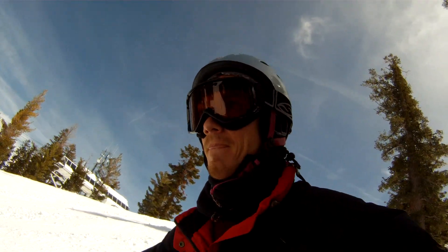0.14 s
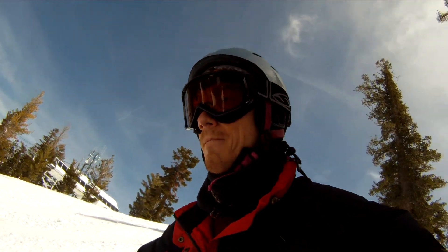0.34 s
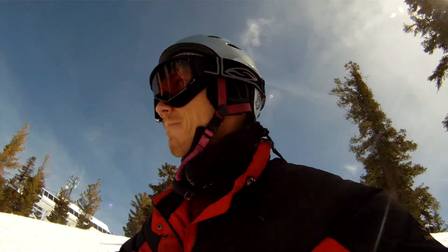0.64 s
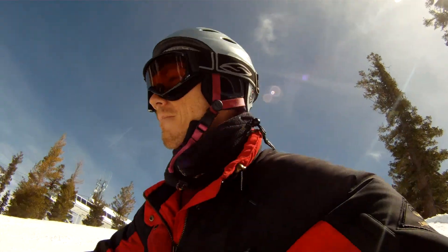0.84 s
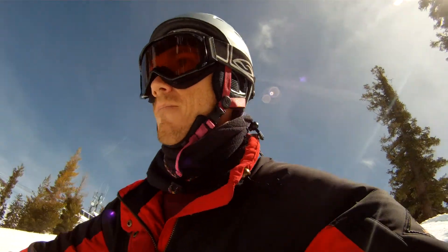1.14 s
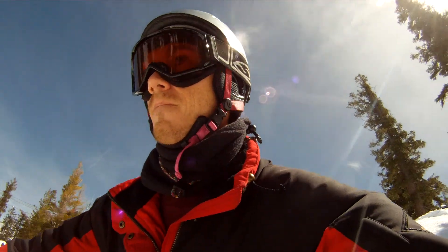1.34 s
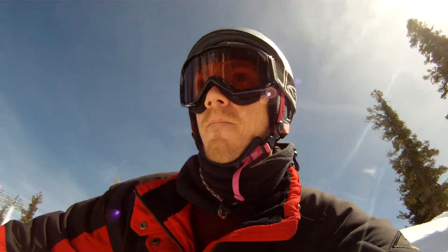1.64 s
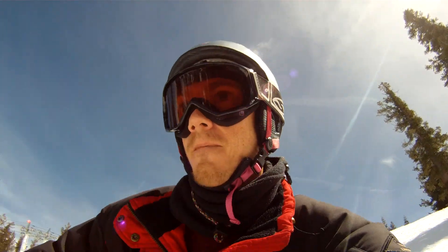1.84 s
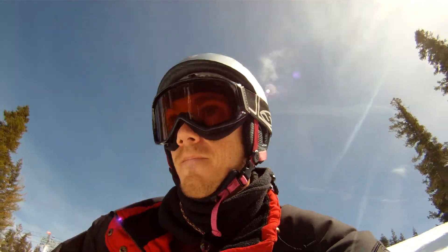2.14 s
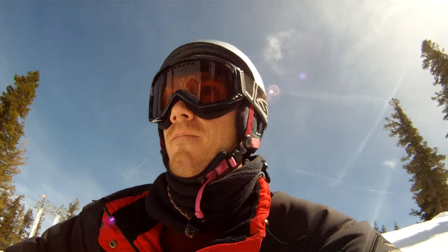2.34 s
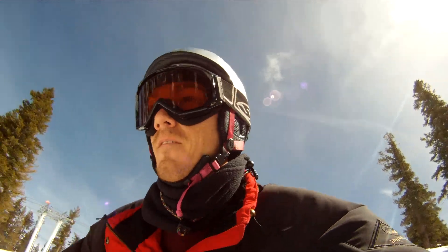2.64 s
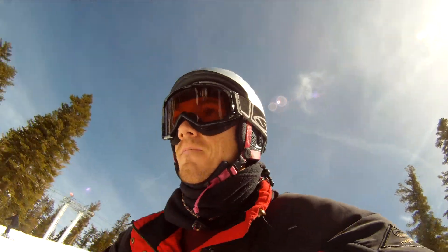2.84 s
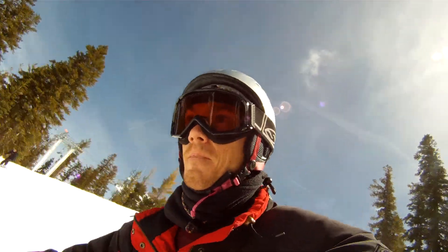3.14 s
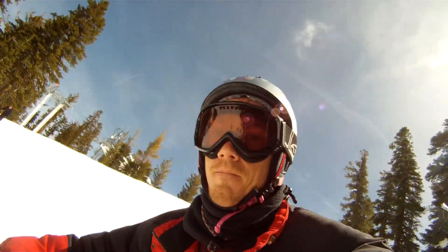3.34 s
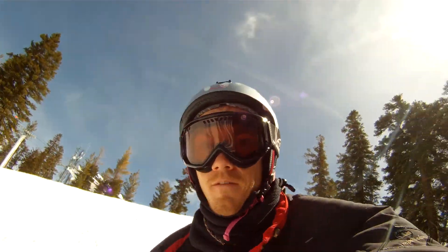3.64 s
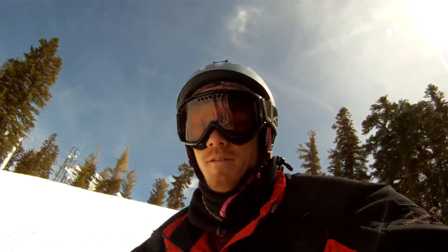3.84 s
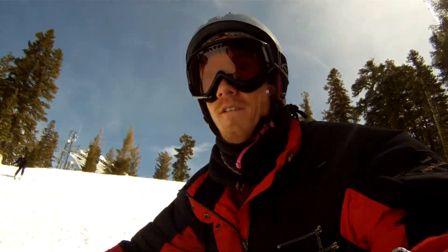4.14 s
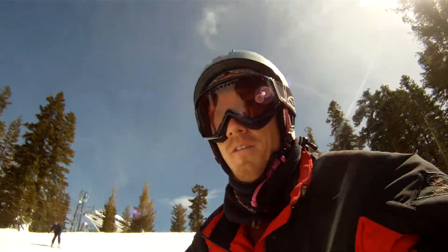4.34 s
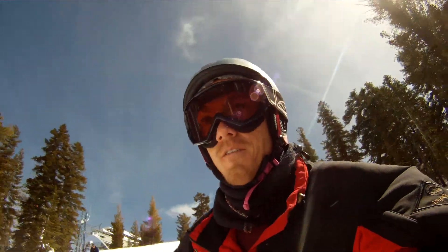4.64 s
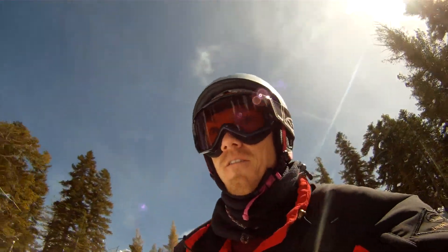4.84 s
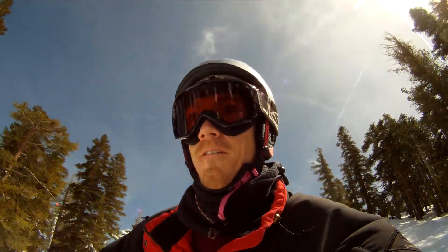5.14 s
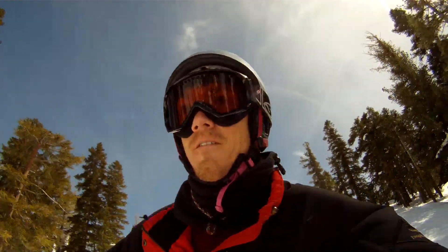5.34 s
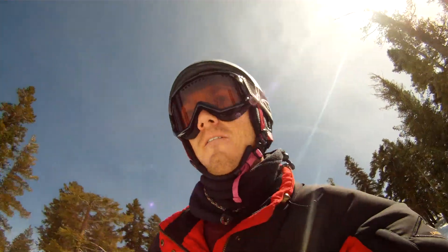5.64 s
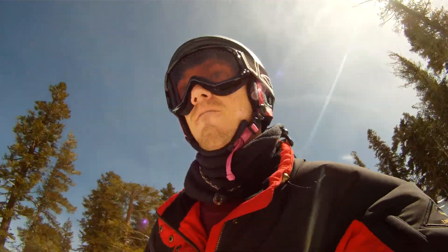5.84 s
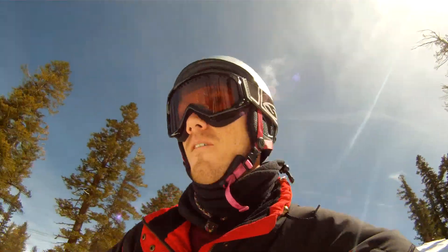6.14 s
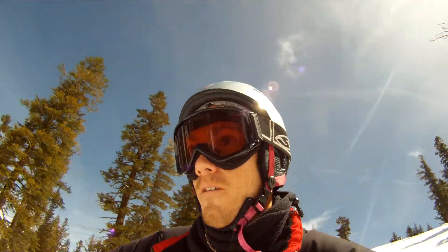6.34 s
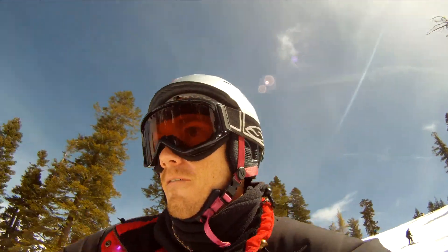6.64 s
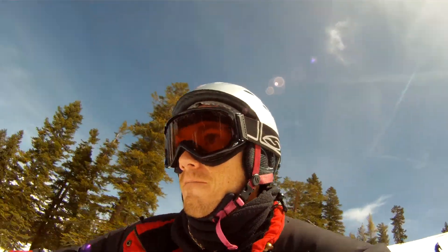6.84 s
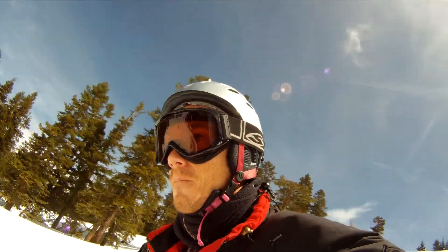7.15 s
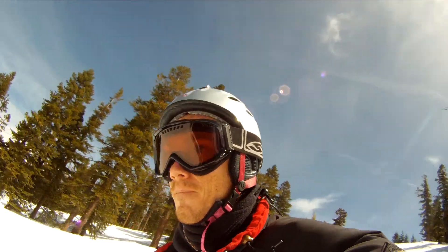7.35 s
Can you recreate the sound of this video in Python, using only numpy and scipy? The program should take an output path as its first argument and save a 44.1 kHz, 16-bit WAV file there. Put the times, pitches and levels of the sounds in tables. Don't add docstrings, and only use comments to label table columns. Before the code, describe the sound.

A skier glides down an open snowy slope, heard from a microphone sealed in a plastic camera housing on a hand-held pole. A grainy, hollow snow hiss runs throughout, with deep lumpy wind buffets and a very faint airy whistle. From 0 to 0.85 s, dry, bright ticks cluster through the pole. The scrape is fuller around 1.4-2 s, then eases toward 3 s with brief edge-bite swells and isolated ticks. From 3.9 s knocks gather; at 4.19 s comes the loudest, a hard plastic clack with a fast chatter, followed by short low hums and smaller knocks until 4.6 s. A second sharp snap lands at 5.14 s. Scattered ticks continue while the hiss builds again, strongest and sprayiest around 6.6-6.9 s, then softens, with a last tick near 7.4 s. The treble is gritty and coarse.

```python
import sys
import numpy as np
from scipy import signal
from scipy.io import wavfile

SR = 44100
rng = np.random.default_rng(int(sys.argv[2]) if len(sys.argv) > 2 else 0)


def volts_from_decibels(level):
    exponent = np.asarray(level, float) / 20
    return 10 ** exponent


def inscribe(sig):
    pcm = np.round(np.clip(np.atleast_2d(sig).T, -1, 1) * 32767)
    wavfile.write(sys.argv[1], SR, pcm.astype(np.int16))


N = 331191

# t/s, level/dB
SEAL_AIR = [(0.0, -61), (1.05, -64.5), (2.01, -60.5), (2.75, -63), (3.09, -73), (3.51, -58.5), (4.14, -67),
            (4.58, -75), (5.46, -71), (6.3, -69), (6.62, -63), (7.01, -59.5), (7.51, -72)]
# t/s, buffeting level/dB, rush level/dB
WIND_LEVELS = [(0.0, -46, -57), (0.2, -48, -70), (0.55, -46, -65), (0.96, -48.5, -59.5),
               (1.84, -44.5, -56.5), (2.6, -47.5, -57.5), (2.9, -51.5, -65), (3.5, -45.5, -57.5),
               (4.0, -45.5, -56.5), (4.28, -42, -47.5), (4.6, -47, -61), (4.81, -45.5, -56),
               (5.5, -46.5, -53.5), (6.0, -42, -52.5), (6.55, -44.5, -52), (7.51, -46, -58)]
# t/s, peak level/dB, length/s
STRONG_GUSTS = [(0.194, -30.5, 0.019), (0.261, -32, 0.025), (0.32, -35, 0.035), (0.372, -38, 0.047),
                (0.624, -36, 0.0173), (1.045, -35.5, 0.027), (1.082, -36, 0.069), (1.946, -37, 0.021),
                (2.185, -33.5, 0.029), (2.771, -34, 0.04), (2.842, -33, 0.031), (2.906, -33.5, 0.04),
                (3.437, -38, 0.022), (3.619, -35, 0.025), (3.986, -32, 0.01), (4.174, -29, 0.0088),
                (4.261, -30.5, 0.012), (4.365, -35.5, 0.015), (4.99, -41, 0.028), (5.387, -30.5, 0.022),
                (5.45, -35.5, 0.025), (5.56, -37, 0.032), (5.92, -41, 0.061), (6.064, -41, 0.023),
                (6.431, -35, 0.016), (6.455, -31, 0.024), (6.556, -35.5, 0.03), (6.665, -32, 0.022),
                (6.917, -31.5, 0.037), (7.33, -39, 0.02)]
# t/s, peak level/dB, length/s
OUTWARD_JOLT = (5.1405, -27, 0.012)
# t/s, peak level/dB, f/Hz
JOINT_HUMS = [(4.083, -45, 750), (4.125, -44, 745), (4.224, -40, 748), (4.298, -42.5, 680),
              (4.317, -42.5, 850), (4.369, -45, 790), (4.416, -43, 770), (4.464, -42.5, 766),
              (4.499, -48, 710)]
# t/s, peak level/dB, contact f/Hz, thud level/dB
POLE_TICKS = [(0.0024, -38.5, 2450, 3.5), (0.1047, -36, 2330, -28), (0.1353, -29, 1400, -26),
              (0.4494, -32, 2310, -21), (0.4873, -36, 2230, -3.5), (0.5214, -40, 2300, -28),
              (0.5254, -32, 2200, -30), (0.5289, -26, 2300, -33), (.5318, -34, 1920, -30),
              (.532, -38, 3700, -30), (0.5597, -32.5, 2280, -29), (0.7233, -31, 2320, -29),
              (0.7622, -33, 3560, -30), (0.7632, -30, 2260, -29), (0.7704, -34.5, 1620, -29),
              (0.7987, -36, 2270, -32), (0.826, -46, 2300, -25), (2.3516, -30, 2140, -17),
              (2.9726, -33, 2250, -25), (3.0604, -37.5, 3100, -25), (3.5623, -28, 2450, -16),
              (3.6492, -30, 3200, -14), (5.084, -32, 1920, -25), (5.464, -27.5, 2330, -21),
              (5.7184, -30, 2090, -20), (6.1204, -33, 2900, -15), (7.1028, -38, 4800, -25),
              (7.1474, -34, 3500, -28), (7.3943, -27, 2050, -30)]
# t/s, peak level/dB, contact f/Hz, thud level/dB,
# crack level/dB
KNOCKS_WITH_CRACK = [(3.936, -38, 3540, -25, -1.5), (3.9877, -29.5, 1500, -2.5, -10),
                     (4.0844, -29, 1940, -21, -13), (4.1744, -25, 1970, -2.5, -15),
                     (4.1865, -14.5, 1360, -8.5, -15), (4.1905, -7, 1336, -17.5, -35),
                     (4.192, -10.5, 1930, -47, -25), (4.1944, -15, 1670, -5.5, -35), (4.264, -36, 1790, 2, -1),
                     (4.4344, -28, 1950, -19, -19), (4.4744, -38, 2180, -9, -11), (4.577, -28, 1940, -15, -19),
                     (4.595, -26.5, 1940, -28, -10.5), (5.1414, -22, 2880, -11.5, -26),
                     (5.142, -14, 2020, -12, -27), (5.1416, -30.5, 4800, -20, -22)]
# f/Hz, level/dB, time to fall 60 dB/s
HOUSING_RING = [
    (750, -44.5, 0.11),
    (1110, -26, 0.032),
    (1524, -20, 0.1),
    (1940, -10.5, 0.029),
    (2480, -22, 0.018),
    (3540, 4, 0.019),
]
# t/s, hiss level/dB, edge pressure level/dB, spray level/dB
SNOW_LEVELS = [(0.0, -47, -54, -63), (0.3, -46, -51, -59), (0.9, -47.5, -51.5, -68.5),
               (1.42, -45, -46.5, -64.5), (1.95, -46, -51, -58), (2.12, -50.5, -60.5, -62),
               (2.7, -54, -59, -66), (2.95, -53, -69, -70.5), (3.26, -52.5, -59.5, -68.5),
               (3.5, -45.5, -63.5, -56.5), (4.0, -46, -57, -61), (4.38, -41, -52, -59.5),
               (4.55, -50, -59, -65), (4.85, -50, -59.5, -67), (5.0, -49.5, -55.5, -65.5),
               (6.3, -45, -49.5, -61), (6.65, -41, -46, -48), (7.2, -51, -58.5, -65)]
# t/s, extra hiss level/dB, length/s, extra spray level/dB
EDGE_BITES = [(0.434, 1, .17, 1), (0.77, 0.5, 0.15, 7), (1.17, 1.5, 0.14, -1), (1.763, 0.5, 0.34, 4),
              (2.15, 1, 0.05, 7), (2.347, 5, 0.18, 6.5), (2.536, 5, 0.31, 4.5), (3.067, 0.5, 0.14, 6.5),
              (3.29, 3.5, 0.13, 5.5), (3.56, 1.5, 0.22, -3), (4.1, 3, .14, 3), (4.22, -1, 0.12, 3),
              (4.567, 2, .05, 2), (4.916, 1.5, 0.063, 2), (5.41, 1.5, 0.26, 5), (5.903, 1, 0.042, 5),
              (6.066, 2, 0.034, 3), (6.38, 2, 0.18, 1), (6.682, 1.5, 0.091, 4), (6.923, 0, 0.27, 4.5),
              (7.314, 3.5, 0.077, 5)]
# f/Hz, width/Hz, level/dB
EDGE_MODES = [(697, 72, -10.5), (902, 100, -13), (1263, 181, -3.5), (1500, 206, -5)]
# f/Hz, width/Hz, level/dB
HISS_MODES = [(1907, 342, -3), (2364, 380, -1), (2674, 253, -1), (3047, 555, -4), (3620, 440, -3.5)]
# f/Hz, width/Hz, level/dB
SPRAY_MODES = [(4350, 1200, -25), (4830, 470, 24), (5700, 1380, 14)]


def rms_one(x):
    return x / np.sqrt(np.mean(x ** 2) + 1e-20)


def peak_one(x):
    return x / np.abs(x).max()


def in_time(rows):
    s, *columns = np.transpose(rows)
    return [np.interp(np.arange(N) / SR, s, c, left=c[0], right=c[-1]) for c in columns]


def drift(rate_hz):
    r = np.exp(-2 * np.pi * rate_hz * 40 / SR)
    noise = rng.standard_normal(N // 40 + 2002)
    slow = signal.lfilter([1], [1, -2 * r, r * r], noise)[2000:]
    return np.interp(np.arange(N) / 40, np.arange(len(slow)), rms_one(slow))


def butter(x, hz, kind, order=2):
    return signal.sosfilt(signal.butter(order, hz, kind, fs=SR, output="sos"), x)


def resonance(x, hz, width_hz):
    r = np.exp(-np.pi * width_hz / SR)
    poles = [1, -2 * r * np.cos(2 * np.pi * hz / SR), r * r]
    return signal.lfilter([(1 - r * r) / 2, 0, (r * r - 1) / 2], poles, x)


def ring(clicks, hz, t60):
    r = volts_from_decibels(-60 / (t60 * SR))
    w = 2 * np.pi * hz / SR
    return signal.lfilter([0, np.sin(w)], [1, -2 * r * np.cos(w), r * r], clicks + 1e-18)


def through(drive, modes, patchy_db):
    total = np.zeros(N)
    for k, (hz, width_hz, db) in enumerate(modes):
        total += (-1) ** k * volts_from_decibels(db + patchy_db * drift(5.6)) * resonance(drive, hz, width_hz)
    return rms_one(total)


def air():
    level_db, = in_time(SEAL_AIR)
    hiss = resonance(resonance(rng.standard_normal(N), 5660, 380), 5030, 1300)
    return volts_from_decibels(level_db + 1.3 * drift(10.5)) * rms_one(hiss)


def wind():
    buffet_db, rush_db = in_time(WIND_LEVELS)
    buffet = butter(butter(rng.standard_normal(N), 4.8, "low", order=1), 13.4, "high")
    buffet = butter(buffet, 220.0, "low", order=1)
    rush = butter(butter(rng.standard_normal(N), 1070.0, "low", order=1), 220.0, "high")
    rumble = volts_from_decibels(buffet_db + 1.0 + 1.84 * drift(14.0)) * rms_one(buffet)
    return rumble + volts_from_decibels(rush_db + 0.24 * drift(34.0)) * rms_one(rush) + gusts()


def gusts():
    puff_db, puff_s = -43, 0.02
    puffs = [(place * (N / SR - 0.1), puff_db + 6.0 * (size - 0.5), puff_s * (0.5 + long))
             for place, size, long in rng.random(size=(24, 3))]
    push = np.zeros(N)
    for s, db, length_s in STRONG_GUSTS + puffs:
        start = round(s * SR)
        dent = signal.windows.hann(max(round(length_s * SR), 8))[:N - start]
        push[start:start + len(dent)] -= volts_from_decibels(db + 4.0) * dent
    jolt_s, jolt_db, jolt_length_s = OUTWARD_JOLT
    bulge = signal.windows.hann(round(jolt_length_s * SR))
    push[round(jolt_s * SR):][:len(bulge)] += volts_from_decibels(jolt_db) * bulge
    return butter(push, 8.0, "high")


def rattle():
    out = np.zeros(N)
    shake = signal.windows.hann(round(0.0035 * SR))
    for s, db, hz in JOINT_HUMS:
        wobble = shake * np.sin(2 * np.pi * hz * np.arange(len(shake)) / SR)
        drive = np.pad(wobble, (0, SR // 5))
        hum = volts_from_decibels(db - 1.5) * peak_one(ring(drive, hz, t60=0.094))
        out[round(s * SR):][:len(hum)] += hum
    return out


def rebounds(count):
    first_s, gap_s, gap_growth = 4.196, 0.0017, 0.98
    s = first_s + np.cumsum(gap_s * gap_growth ** np.arange(count)) - gap_s
    return [(at, -15.5 - 0.5 * k, 2050, -21, -12.5) for k, at in enumerate(s)]


def ticks():
    crack_db, per_octave_db, lag = -16, 8, 0.14
    return [(s, db, hz, thud_db, crack_db + per_octave_db * np.log2(hz / 2000) - lag * (db + 26))
            for s, db, hz, thud_db in POLE_TICKS]


def knocks():
    out = np.zeros(N)
    n = round(0.1 * SR)
    age = np.arange(n) / SR
    click = np.eye(1, n)[0]
    thud = -peak_one(butter(butter(click, 490.0, "low"), 58.0, "high"))
    hits = KNOCKS_WITH_CRACK + rebounds(count=7) + ticks()
    chance = rng.uniform(-1.3, 1, (len(hits), len(HOUSING_RING)))
    grit = rng.standard_normal((len(hits), n))
    for (s, db, hz, thud_db, crack_db), luck, noise in zip(hits, chance, grit):
        contact_s = 0.001005 * (1 - 0.11 * (db + 31.5) / 10)
        force = (age / contact_s) ** 2 * np.exp(-2 * age / contact_s)
        tone = -peak_one(force * np.sin(2 * np.pi * hz * age))
        snap = np.roll(click, round(contact_s * SR)) + 0.23 * noise * peak_one(force)
        crack = butter(butter(snap, [2500.0, 4500.0], "band", order=1), 8300.0, "low")
        hit = tone + volts_from_decibels(thud_db + 1.5) * thud + volts_from_decibels(crack_db + 1.5) * peak_one(crack)
        for (mode_hz, mode_db, t60), z in zip(HOUSING_RING, luck):
            bright_db = crack_db * (mode_hz > 2700)
            strength = volts_from_decibels(mode_db + bright_db + 8.5 * z) * (contact_s / 0.00096) ** 2
            hit += strength * peak_one(ring(snap, mode_hz, t60))
        i = max(round((s - 0.0003) * SR), 0)
        out[i:i + n] += volts_from_decibels(db - 3.0) * hit[:N - i]
    return out


def bites():
    ramp_s, share_on_edge = 0.049, 0.74
    t = np.arange(N) / SR
    extra_db = np.zeros((3, N))
    for s, db, length_s, spray_db in EDGE_BITES:
        shape = np.clip(np.minimum(t - s, s + length_s - t) / ramp_s + 0.5, 0, 1)
        extra_db += np.array([[db], [share_on_edge * db], [spray_db]]) * shape
    return extra_db


def snow():
    hiss_db, edge_db, spray_db = in_time(SNOW_LEVELS) + bites()
    sizes = volts_from_decibels(3.25 * np.minimum(rng.exponential(1, N), 5)) * rng.choice([-1, 1], N)
    grains_per_s = 900.0 * volts_from_decibels(5.0 * drift(14.0))
    grains = sizes * (rng.random(N) < grains_per_s / SR)
    bumps = volts_from_decibels(0.53 * drift(19.0) + 0.85 * drift(23.0))
    drive = (rng.standard_normal(N) + 0.43 * rms_one(grains)) * bumps
    hiss = through(butter(drive, 3580.0, "low"), HISS_MODES, patchy_db=0.5)
    edge = through(resonance(drive, 1200, 720), EDGE_MODES, patchy_db=2.0)
    spray = through(resonance(drive, 2900, 3100), SPRAY_MODES, patchy_db=1.0)
    return volts_from_decibels(hiss_db) * hiss + volts_from_decibels(edge_db) * edge + volts_from_decibels(spray_db) * spray


def scene():
    return (air() + wind() + rattle() + knocks() + snow())[None]


def low_pass(x):
    return signal.sosfilt(signal.butter(12, 16460, fs=SR, output="sos"), x)


def record(dry):
    up, down, held_times = 40, 147, 4
    slow = signal.resample_poly(dry, up, down, axis=1)
    held = np.repeat(slow, held_times, axis=1)
    held = signal.resample_poly(held, down, up * held_times, axis=1)
    held = np.pad(held, ((0, 0), (0, 8)))[:, :N]
    steep_cut = signal.ellip(16, 0.3, 42, 15330, fs=SR, output="sos")
    mix = signal.sosfilt(steep_cut, held)
    return low_pass(mix)


dry = scene()
out = record(dry)
inscribe(out)
```